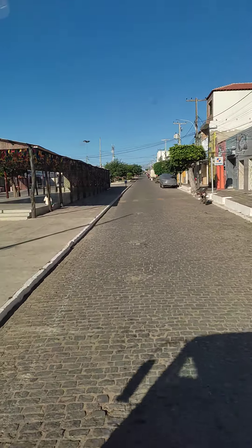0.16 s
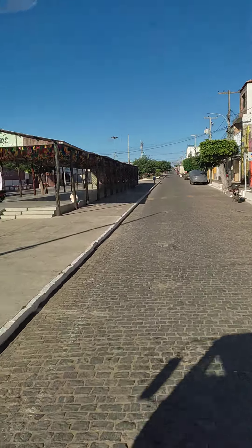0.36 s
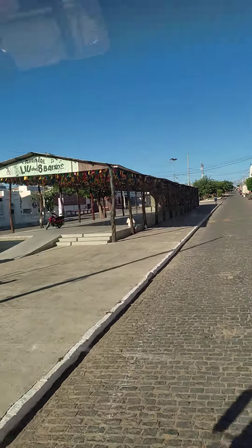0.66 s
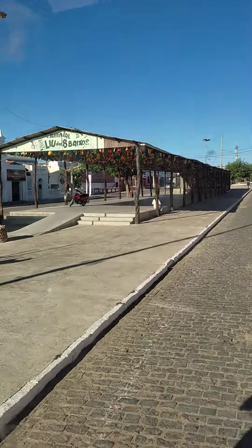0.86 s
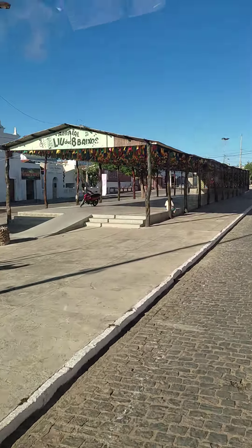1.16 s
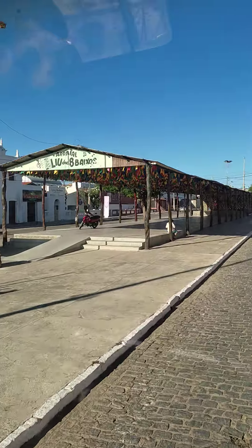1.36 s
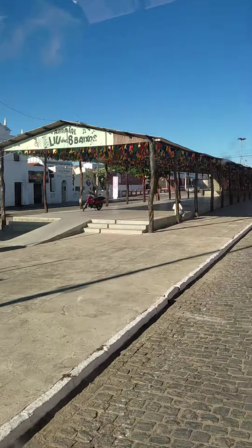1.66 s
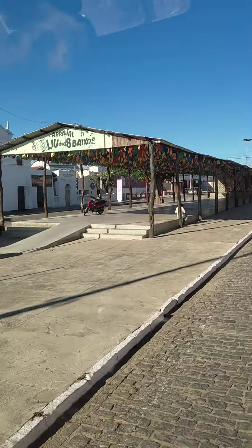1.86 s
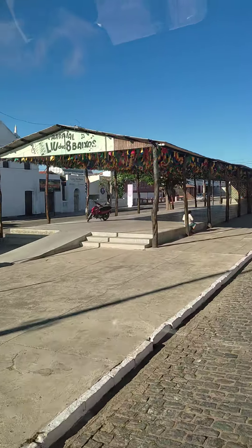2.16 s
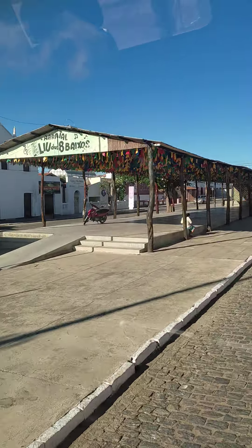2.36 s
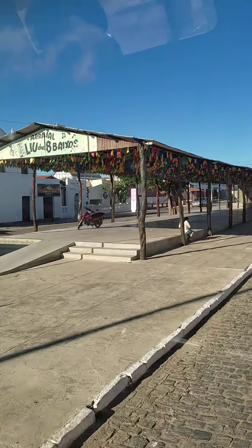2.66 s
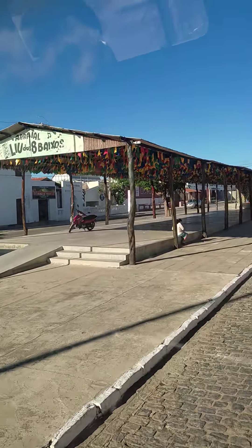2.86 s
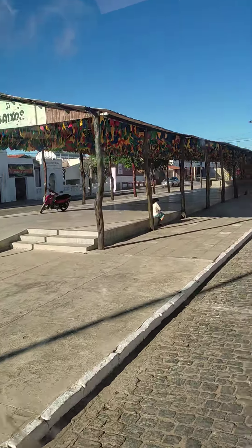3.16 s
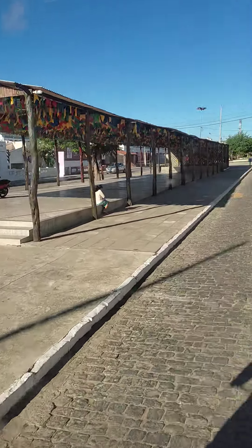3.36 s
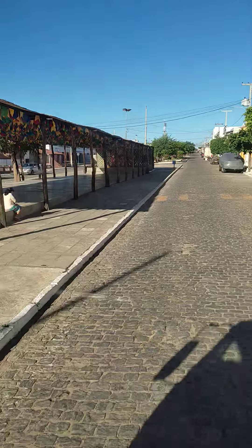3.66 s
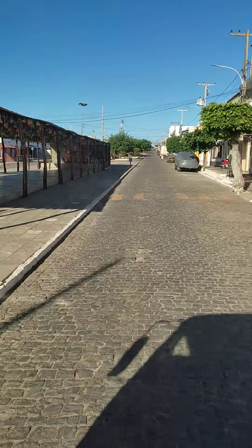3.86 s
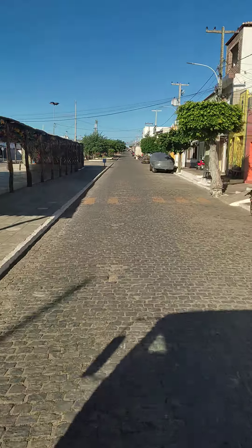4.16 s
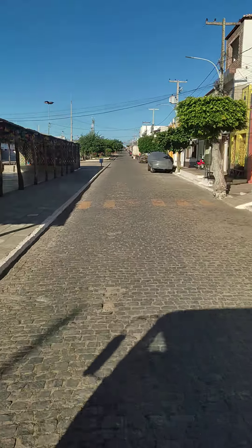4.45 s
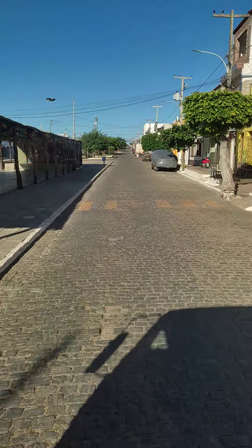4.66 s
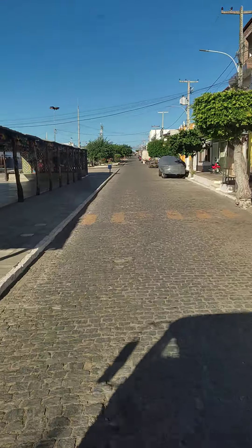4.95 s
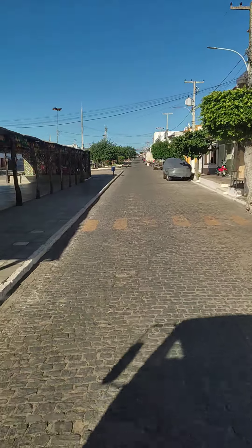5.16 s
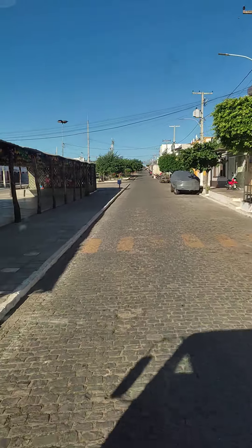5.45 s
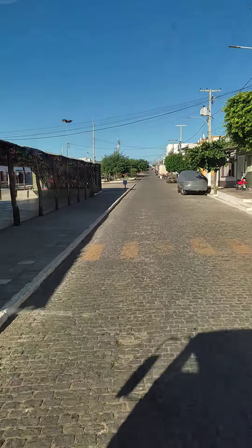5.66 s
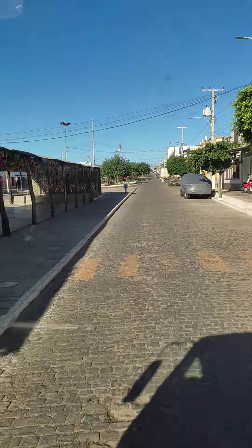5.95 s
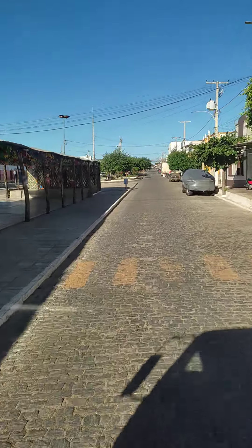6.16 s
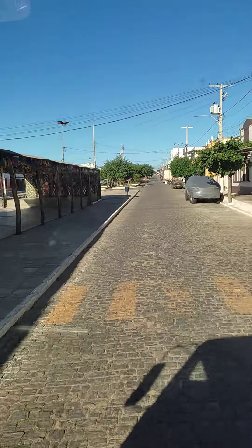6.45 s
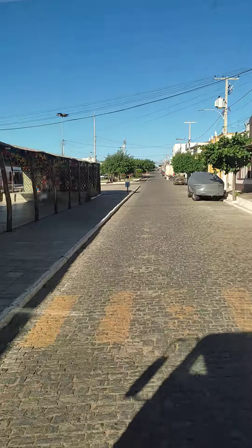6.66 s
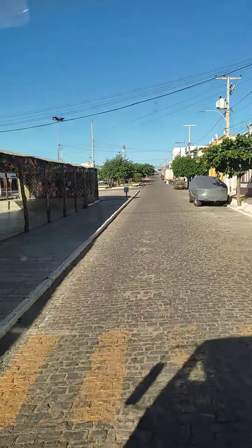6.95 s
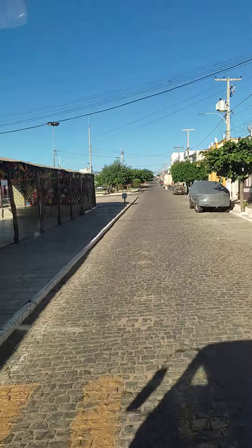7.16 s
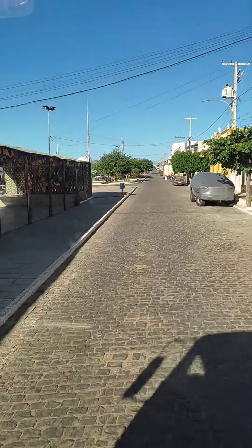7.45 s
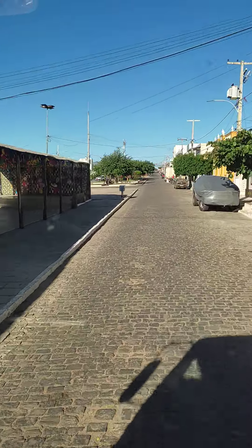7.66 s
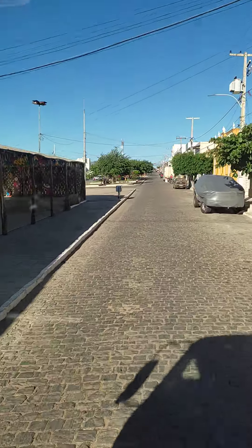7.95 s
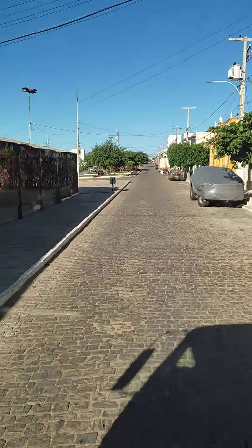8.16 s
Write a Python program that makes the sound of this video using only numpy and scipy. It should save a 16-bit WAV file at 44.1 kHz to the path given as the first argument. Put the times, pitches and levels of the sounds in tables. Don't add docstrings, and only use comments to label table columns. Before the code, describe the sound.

Inside a small car, the engine coasts, shudders as it takes up load, then climbs steadily over drumming cobblestones with knocks and rattling trim.

```python
import sys
import numpy as np
from scipy import signal
from scipy.fft import rfft, irfft
from scipy.io import wavfile
from scipy.ndimage import uniform_filter1d

SR = 44100
rng = np.random.default_rng(int(sys.argv[2]) if len(sys.argv) > 2 else 0)


def generate_wav(sig):
    pcm = np.round(np.clip(np.atleast_2d(sig).T, -1, 1) * 32767).astype(np.int16)
    wavfile.write(sys.argv[1], SR, pcm)


def ratio_of_db(decibels):
    return 10 ** (np.asarray(decibels, float) / 20)


N = 365588
TIME = np.arange(N) / SR


def read(points, hz):
    f, value = np.transpose(points)
    return np.interp(np.log(hz + 1), np.log(f + 1), value)


def curves(rows, t):
    s, *columns = np.transpose(rows)
    return [np.interp(t, s, c) for c in columns]


def evened(x):
    return x / np.sqrt(np.mean(x ** 2) + 1e-20)


def add(mix, start_s, sound):
    part = mix[round(start_s * SR):][:len(sound)]
    part += sound[:len(part)]


def mode(x, hz, width_hz):
    return evened(signal.lfilter(*signal.iirpeak(hz, hz / width_hz, fs=SR), x))


def resonate(x, hz, width_hz):
    turn = np.exp(2j * np.pi * np.cumsum(hz * np.ones(len(x))) / SR)
    r = np.exp(-np.pi * width_hz / SR)
    smooth = signal.lfilter([1 - r], [1, -r], x / turn)
    return 2 * (turn * smooth).real


def band(x, lo_hz, hi_hz):
    return signal.sosfilt(signal.butter(2, [lo_hz, hi_hz], "bandpass", fs=SR, output="sos"), x)


def wander(seconds):
    size = round(seconds * SR)
    smooth = uniform_filter1d(rng.standard_normal(N), size)
    return evened(uniform_filter1d(smooth, size))


STONES = wander(0.01)


def patchy_noise(spectrum, size, patchy_db, flicker_db):
    hop = size // 4
    frames, hz = N // hop + 5, np.fft.rfftfreq(size, 1 / SR)
    a, b, patches = rng.standard_normal((frames, len(hz), 3)).T
    patches = uniform_filter1d(patches, 6, 0)
    patches = evened(uniform_filter1d(patches, 12, 1))
    z = (a + 1j * b) * ratio_of_db(read(spectrum, hz)[:, None] + patchy_db * patches)
    noise = signal.istft(z, nperseg=size, noverlap=size - hop)[1][:N]
    return evened(noise * ratio_of_db(flicker_db * STONES))


# freq_hz, level_db
ROAR = [(150, -38.5), (330, -0.5), (420, 0), (600, -4.5), (1070, -3), (1500, -7), (2300, -11),
        (2900, -26.5), (4500, -47)]


def clatter(count, per_s, spread_db, width_hz):
    out = np.zeros(N)
    for hz in np.geomspace(430, 4300, count) * rng.uniform(0.95, 1.04, count):
        tap_db = spread_db * np.minimum(rng.exponential(1, N), 3)
        taps = (rng.random(N) < per_s / SR) * ratio_of_db(tap_db)
        out += mode(taps, hz, width_hz) * ratio_of_db(read(ROAR, hz))
    return evened(out * ratio_of_db(2.1 * STONES))


# time_s, roughness_db
ROAD = [(0.0, -3), (0.2, -3.5), (0.66, -5), (1.03, 0.5), (1.17, -5.5), (1.4, 0.5), (2.0, -1), (2.26, -3.5),
        (2.6, -2), (3.1, 0), (3.27, -3), (4.2, 0), (5.2, 0.5), (5.54, 3.5), (5.84, 0.5), (6.88, -1.5),
        (7.4, 1), (8.29, -1)]
# freq_hz, level_db
DRUMMING = [(15, -35), (28, -11.5), (50, 3), (100, -3), (165, -1.5), (235, -15), (300, -7), (360, -19.5),
            (600, -37)]
# freq_hz, level_db
HISS = [(1200, -38.5), (2400, 4), (2850, 1), (3500, 2), (4100, 0.5), (4850, -12.5), (5800, -0.5), (6500, 4),
        (7500, 3)]


def road():
    (rough_db,), (load_db,) = curves(ROAD, TIME), curves(LOAD, TIME)
    drum_db = -17 + 0.94 * rough_db + 0.92 * wander(0.092)
    drum_db -= 0.29 * np.maximum(load_db, -12)
    drum_db -= 1.5 / (1 + np.exp((5.7 - TIME) / 0.15))
    roar_db = -27.5 + rough_db + 0.98 * wander(0.066)
    hiss_db = -27 + 0.95 * rough_db + 0.76 * uniform_filter1d(load_db, size=9000)
    drumming = patchy_noise(DRUMMING, size=4096, patchy_db=1.7, flicker_db=0.57)
    roar = patchy_noise(ROAR, size=512, patchy_db=1.76, flicker_db=-0.2)
    loose = ratio_of_db(-11.5) * clatter(count=14, per_s=10, spread_db=0.5, width_hz=16)
    hiss = patchy_noise(HISS, size=256, patchy_db=2.0, flicker_db=1.17)
    return ratio_of_db(drum_db) * drumming + ratio_of_db(roar_db) * (roar + loose) + ratio_of_db(hiss_db) * hiss


# time_s, pitch_hz, level_db
WHINE = [
    (4.2, 6820, -67.5),
    (4.55, 6790, -61),
    (4.75, 7100, -62),
    (4.9, 7380, -38.5),
    (5.1, 7260, -40),
    (5.3, 7550, -67.5),
]


def whine():
    hz, level_db = curves(WHINE, TIME)
    whistle = resonate(rng.standard_normal(N), hz, 150)
    return ratio_of_db(level_db) * evened(resonate(whistle, hz, 150))


def blows(rows, spread, offset_db, t60_s):
    out, t = np.zeros(N), np.arange(8000) / SR
    for start_s, level_db, pitch_hz in rows:
        burst = mode(rng.standard_normal(len(t)), pitch_hz, spread * pitch_hz)
        ring = 0.95 * np.sin(2 * np.pi * pitch_hz * t) + 0.62 * burst
        attack = np.clip(t / 0.0035, 0, 1)
        add(out, start_s, ratio_of_db(level_db + offset_db - 60 * t / t60_s) * attack * ring)
    return out


# start_s, level_db, pitch_hz
KNOCKS = [(0.061, -4.5, 757), (0.089, -5.5, 637), (0.266, -13, 1287), (0.289, -24, 960), (0.7, -14, 398),
          (0.759, -9, 562), (0.979, -7.5, 392), (1.539, -9.5, 407), (2.092, -11.5, 433),
          (2.599, -11.5, 903), (2.71, -11.5, 1168), (3.089, -18.5, 485), (3.531, -7, 365), (4.933, -8, 905),
          (5.078, -11.5, 702), (5.395, -20, 978.8), (5.645, -9, 558), (5.87, -16.5, 504), (6.199, -11, 377),
          (6.52, -8, 990), (6.62, -18.5, 490), (7.177, -12, 726), (7.241, -17.5, 1025), (7.579, -9.5, 672),
          (7.898, -13.5, 557), (8.083, -14.5, 349)]


def knocks():
    return blows(KNOCKS, spread=0.6, offset_db=-9.0, t60_s=0.12)


# start_s, level_db, pitch_hz
THUMPS = [(0.146, -3, 177), (0.285, -5.5, 188), (0.512, -4, 180.5), (0.672, -6, 165), (0.82, -7, 167),
          (0.944, -5, 160), (0.992, -2, 148), (1.089, -1.5, 177), (1.13, -1.5, 164), (1.402, -0.5, 165.5),
          (1.72, -2, 150), (2.092, 2, 193), (2.833, -7, 159), (4.11, -4.5, 312), (4.162, -5.5, 315),
          (4.264, -8, 179), (4.932, -7, 186.9), (5.417, -22, 151), (5.618, -10, 182), (8.083, 0.5, 188.4)]


def thumps():
    return blows(THUMPS, spread=0.22, offset_db=-7, t60_s=0.13)


# freq_hz, width_hz, level_db
TRIM = [(1787, 130, 1.5), (2160, 230, -1), (2460, 83, -7), (1483, 140, 0)]
# start_s, level_db, low_db, middle_db
RATTLES = [(0.0832, -19, 10, -9), (0.256, -15, 5, -2.5), (0.815, -17, 10, -0.5), (0.829, -15.5, 8, 1),
           (1.0064, -13.5, 5.5, -4), (1.565, -18, 6, -1), (1.9503, -15, -7, -3), (1.9653, -25.5, -3, 8.5),
           (2.0847, -14.5, -1, 0), (2.424, -19.5, -11, -2), (2.482, -20.5, -23, -12),
           (2.5271, -20.5, 9, 2.5), (2.6262, -21, 10, -3.5), (2.71, -19, -8, 2.5), (3.0226, -22.5, -6, 0),
           (3.1683, -18, 3, 1.5), (3.5874, -20, 1, 2), (3.97, -18, -14, 3), (4.065, -16, 10, 2.5),
           (4.17, -15, 7, 3), (4.2573, -15, -16, 1.5), (4.3577, -20, -4.5, 4.5), (5.6164, -12.5, -6, -5),
           (6.1214, -20, 9, -1), (6.1953, -19.5, 10, 5), (6.618, -16.5, 10, -1.5), (6.9772, -21, -14, -14),
           (7.689, -25.5, 9, -1), (7.925, -21.5, 11.5, 1.5), (8.0877, -21.5, -1, -1)]
# start_s, level_db, low_db
FLAPS = [(0.0024, -31, 24.5), (0.0703, -30, 25), (0.146, -20, 3), (0.201, -26.5, 2), (0.5136, -25, 11.5),
         (1.3824, -34, 6), (1.8396, -20, 8.5), (3.055, -20, -11), (3.472, -24.5, 10.5), (4.105, -24.5, -3),
         (6.022, -35.5, -2), (7.1743, -23.5, 15.5), (4.757, -26, -6), (7.687, -23, -12)]
# start_s, level_db
MORE_RATTLES = [(0.455, -27), (0.975, -26.5), (2.171, -27), (2.553, -22), (3.3913, -23), (3.68, -22), (3.712, -33),
                (3.852, -24), (4.5053, -21.5), (4.6008, -33), (6.5127, -22), (7.797, -24)]


def rattles():
    out, t = np.zeros(N), np.arange(3000) / SR
    trim_hz, flap_hz = 6850, 3440
    rows = [(*row, trim_hz) for row in RATTLES]
    rows += [(*row, 0, flap_hz) for row in FLAPS]
    rows += [(*row, -11, -1.5, trim_hz) for row in MORE_RATTLES]
    attack = np.clip(t / 0.0022, 0, 1)
    decay_db = -60 * np.maximum(t - 0.014, 0) / 0.053 - 150 * t
    first_contact = 1 + 0.6 * np.exp(-t / 0.0038)
    shape = attack * ratio_of_db(decay_db) * first_contact
    for start_s, level_db, low_db, middle_db, ring_hz in rows:
        white, grain = rng.standard_normal((2, len(t)))
        hz = ring_hz * (1 + 0.042 * rng.uniform(-1, 1))
        chatter = white * ratio_of_db(0.38 * evened(uniform_filter1d(grain, 60)))
        high = 0.46 * evened(band(chatter, 3000, 4090)) + 1.05 * evened(band(chatter, 4800, 9000))
        high += 0.69 * mode(chatter, hz, 850)
        rings = evened(sum(ratio_of_db(db) * mode(chatter, f, width_hz) for f, width_hz, db in TRIM))
        middle = 0.21 * evened(band(chatter, 1400, 3500)) + 0.66 * rings
        low = evened(band(chatter, 450, 1400))
        contact = high + ratio_of_db(middle_db + 5.5) * middle + ratio_of_db(low_db - 3.0) * low
        add(out, start_s, ratio_of_db(level_db - 11.5) * shape * contact)
    return out


# freq_hz, width_hz, level_db
PANELS = [(520, 40, -4), (705, 28, 0), (1065, 45, 2), (1285, 40, -6), (3290, 110, -11)]


def panels(angle):
    firing = np.diff(np.floor(angle / (2 * np.pi)), prepend=0)
    shake = evened(firing) + 0.66 * rng.standard_normal(N)
    return evened(sum(ratio_of_db(db) * mode(shake, f, width_hz) for f, width_hz, db in PANELS))


# time_s, firing_pattern_hz
SPEED = [(0.0, 35.6), (0.39, 35.3), (1.38, 30.2), (1.7, 36.0), (1.96, 28.4), (2.22, 34.3), (2.47, 29.4),
         (2.79, 34.3), (2.98, 33.0), (3.19, 35.27), (3.37, 32.3), (3.6, 35.9), (3.88, 35.9), (4.08, 37.3),
         (5.29, 41.9), (6.7, 46.84), (7.11, 47.5), (8.29, 50.4)]
# time_s, load_db
LOAD = [(0.0, -17), (0.75, -9), (1.15, -15), (1.4, -20.5), (1.44, -2.5), (2.1, -2.5), (2.3, -3.5),
        (2.6, -1.5), (3.0, -1), (3.3, -4), (3.88, 0.5), (4.1, -1), (4.6, 0.5), (5.05, -2), (5.75, 2),
        (6.0, -1.5), (6.27, 1), (8.29, -1)]
# freq_hz, level_db
SECOND = [(57, -17), (64, -20.5), (71, -17), (85.8, -21), (87.2, -14), (91, -12.5), (101, -14.5)]
# freq_hz, level_db
THIRD = [(88, -14.5), (100, -13), (115, -18), (126, -18), (132, -24), (150, -25)]
# order_multiple, level_db
WEAK_ORDERS = [(1, 1.5), (4, -4), (5, -8), (6, -19.5), (7, -14), (8, -11.5), (9, -19.5), (10, -16)]
# freq_hz, level_db
CABIN = [(30, 3), (42, 2), (49, 5), (125, 10), (150, -1.5), (200, -1.5), (240, -17.5), (285, 10),
         (308, 12.5), (335, -2.5), (450, -1)]


def engine():
    (hz,), (foot_db,) = curves(SPEED, TIME), curves(LOAD, TIME)
    hz = uniform_filter1d(hz, size=1800)
    angle = 2 * np.pi * np.cumsum(hz * (1 + 0.0021 * wander(0.032))) / SR

    lumps_db = 1.08 + 0.34 * np.maximum(-foot_db - 6, 0)
    bite_s, bite_fade_s = 1.42, 0.74
    bite_db = 8 * (TIME > bite_s) * np.exp(-np.abs(TIME - bite_s) / bite_fade_s)
    second_db = foot_db + read(SECOND, 2 * hz) + lumps_db * wander(0.037) + bite_db + 4.5
    third_db = foot_db + read(THIRD, 3 * hz) + lumps_db * wander(0.053) + 4.0
    out = ratio_of_db(second_db) * np.cos(2 * angle) + ratio_of_db(third_db) * np.cos(3 * angle + 3.1)

    rasp_hz, rasp_width_hz = 39.06, 3.4
    rasp_db = -31.5 + 0.52 * foot_db + 7 * np.exp(-((hz - rasp_hz) / rasp_width_hz) ** 2)
    boom_db = 10 * np.log10(uniform_filter1d(out ** 2, size=9000) + 1e-9)
    low_drive_db = 0.52 * boom_db - 19.5
    high_drive_db = uniform_filter1d(rasp_db, size=5000) + 5.0
    unsteady = wander(0.17)
    for k, db in WEAK_ORDERS:
        drive_db = low_drive_db if k < 6 else high_drive_db
        level_db = drive_db + db + read(CABIN, k * hz) + 1.4 * np.roll(unsteady, rng.integers(N))
        out += ratio_of_db(level_db) * np.cos(k * angle + rng.uniform(0, 2 * np.pi))
    return out + ratio_of_db(uniform_filter1d(rasp_db, size=20000) - 7.5) * panels(angle)


def scene():
    return (road() + whine() + knocks() + thumps() + rattles() + engine())[None]


def band_limit(x):
    return signal.sosfilt(signal.butter(12, 8880, fs=SR, output="sos"), x)


# edge_hz, step_above_db
SHELVES = [(2430, -3.5), (3540, -5), (5850, 4)]


def record(dry):
    limited = 1.303 * np.tanh(dry / 1.325)
    hz = np.fft.rfftfreq(N, 1 / SR)
    colour_db = sum(db / (1 + np.exp(np.clip((edge_hz - hz) / 12, -50, 50))) for edge_hz, db in SHELVES)
    colour_db = colour_db - 20 * np.log10(1 + (38 / (hz + 1)) ** 3)
    colour_db = colour_db - np.clip((hz - 7545) * 0.8, 0, 42)
    colour_db = colour_db - np.clip((hz - 7700) * 0.09, 0, 70)
    return band_limit(irfft(rfft(limited) * ratio_of_db(colour_db), N))


dry = scene()
out = record(dry)
generate_wav(out)
```